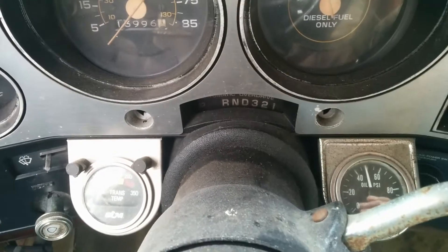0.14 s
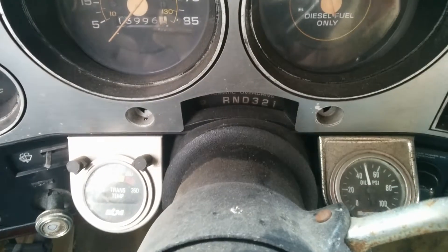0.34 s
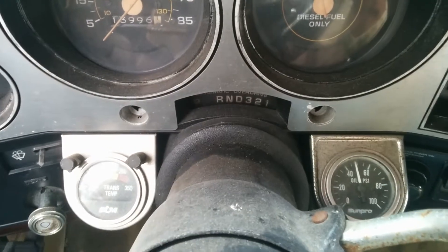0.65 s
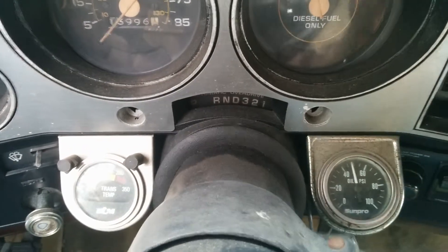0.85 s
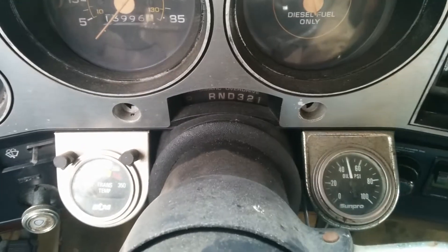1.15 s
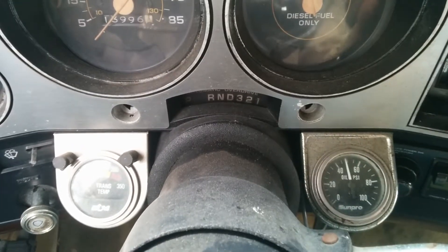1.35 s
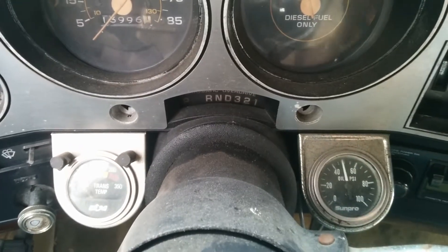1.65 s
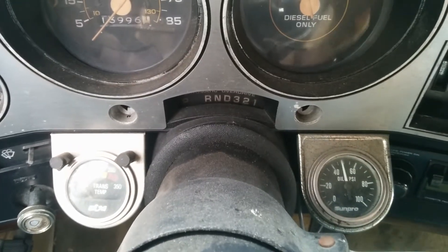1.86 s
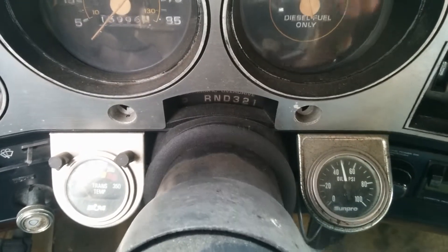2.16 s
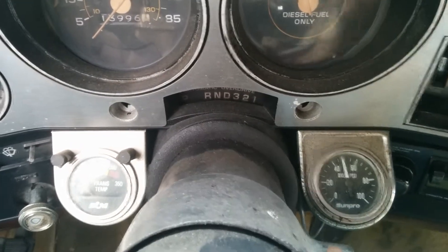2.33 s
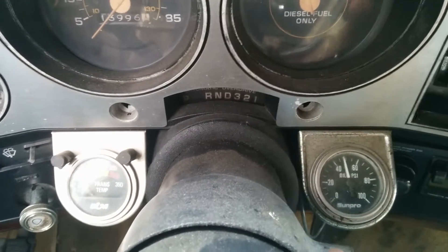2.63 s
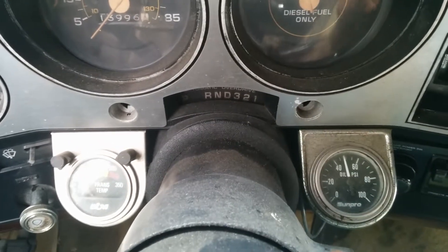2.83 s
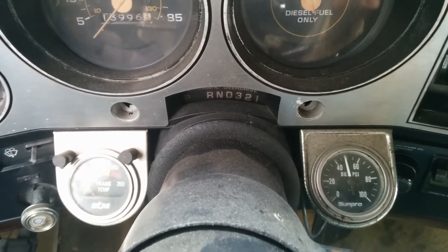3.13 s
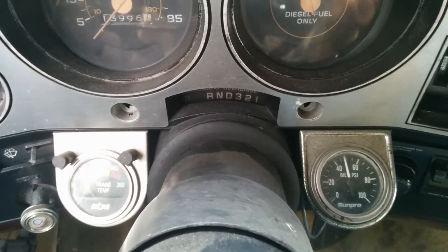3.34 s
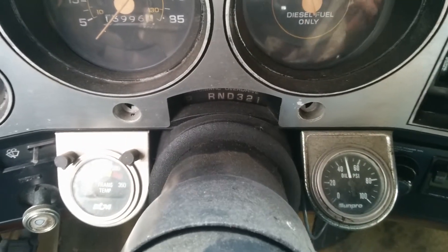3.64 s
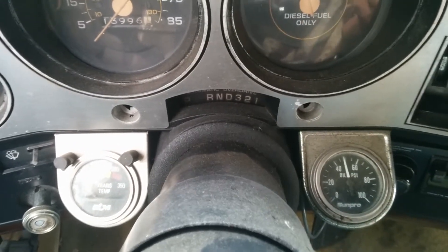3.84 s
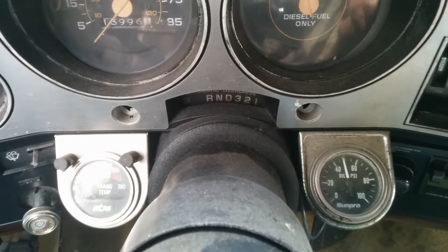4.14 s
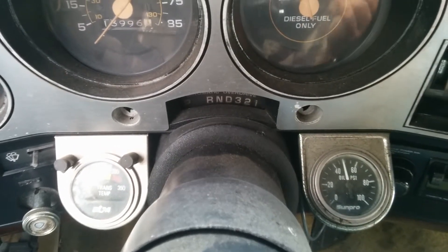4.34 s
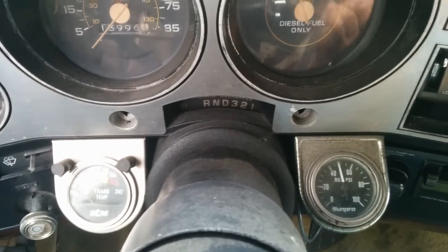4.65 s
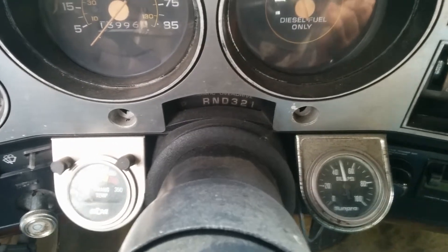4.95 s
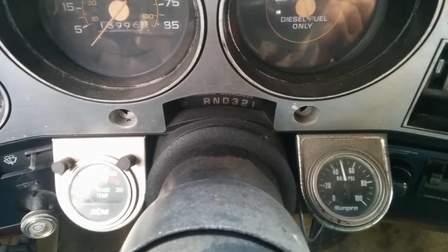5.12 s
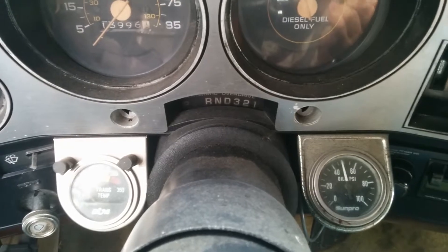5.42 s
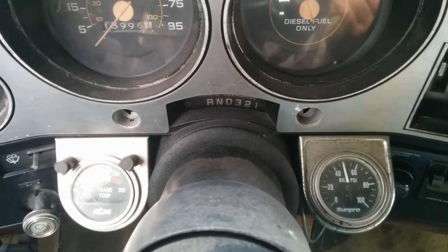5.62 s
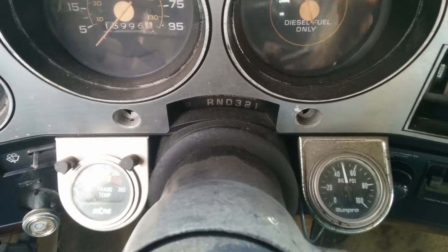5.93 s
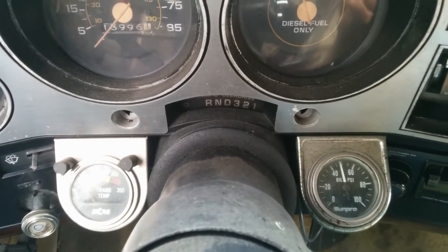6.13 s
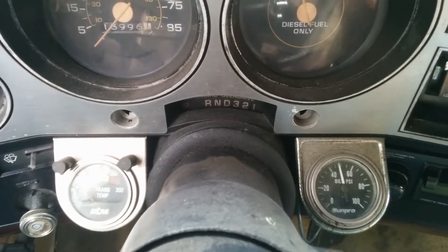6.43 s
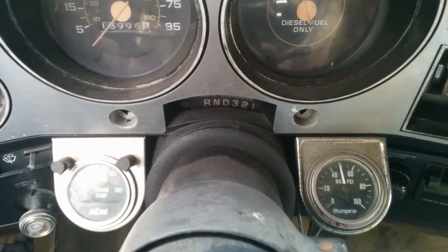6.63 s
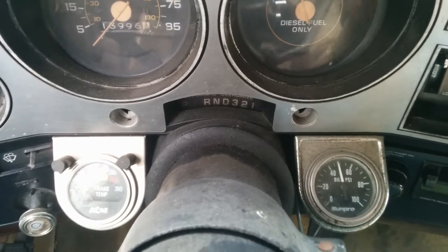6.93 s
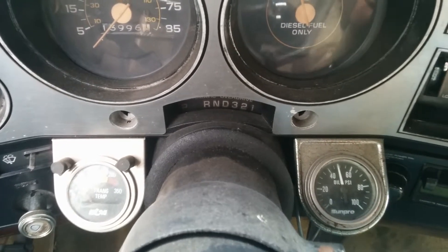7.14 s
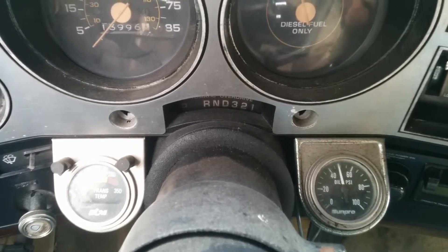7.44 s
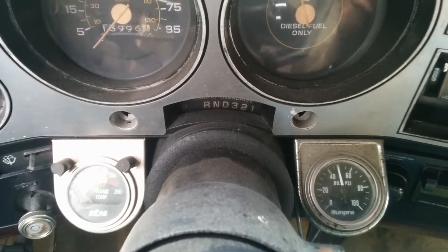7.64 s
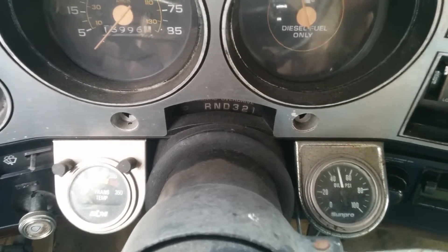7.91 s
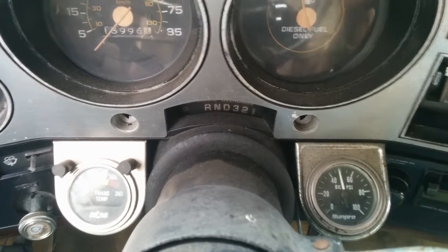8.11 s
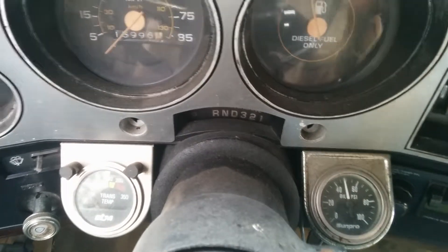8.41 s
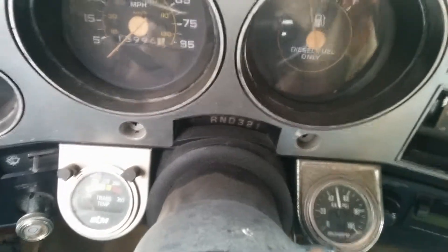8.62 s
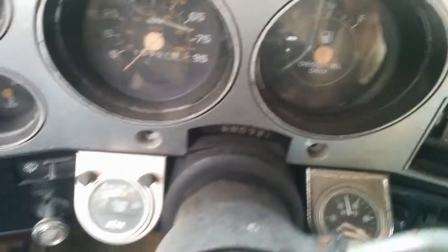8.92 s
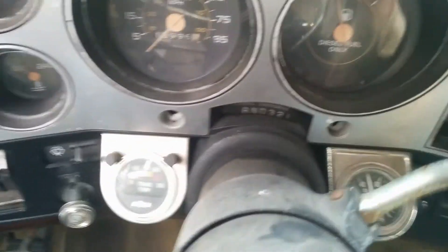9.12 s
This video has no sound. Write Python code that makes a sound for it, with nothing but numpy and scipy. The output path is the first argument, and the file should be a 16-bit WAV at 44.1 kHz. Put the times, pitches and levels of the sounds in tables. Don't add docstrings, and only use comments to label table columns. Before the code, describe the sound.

A big diesel idles with a steady low boom and knocking clatter inside a vehicle cab, broken by hard lever clacks and dull trim rattles.

```python
import sys
import numpy as np
from scipy import signal
from scipy.fft import rfft, irfft
from scipy.io import wavfile
from scipy.ndimage import uniform_filter1d

SR = 44100
rng = np.random.default_rng(int(sys.argv[2]) if len(sys.argv) > 2 else 0)


def ratio(d):
    e = np.asarray(d, float) / 20
    return 10 ** e


def pcm_store(signal):
    levels = np.round(np.clip(np.atleast_2d(signal), -1, 1) * 32767)
    wavfile.write(sys.argv[1], SR, levels.astype(np.int16).T)


N = 408807
T = np.arange(N) / SR

# (frequency [Hz], density [dB per Hz])
AIR_SPECTRUM = [(4200, -52.5), (4440, -19.5), (8340, -31), (15100, -31.5), (16000, -29)]
# (time [s], ring peak [dB], ring frequency [Hz], crack peak [dB], body re ring [dB])
CLACKS = [(0.8909, -46, 3340, -62.5, -10), (0.9524, -20, 3260, -35, 11), (0.9607, -18, 5560, -18, 3),
          (0.9844, -24, 2200, -49, 3.5), (1.0194, -36, 2550, -59, 0), (1.1443, -28.5, 2492, -35, 4.5),
          (1.1944, -38, 4660, -47, 4), (1.2214, -59, 2750, -54, -1.5), (2.2488, -28.5, 2950, -35.5, 4),
          (2.4339, -28.5, 2250, -60, -7), (2.4494, -33, 4100, -57, 2.5), (2.4738, -39.5, 3260, -56, -4.5),
          (3.6636, -28, 2200, -57, -5.5), (8.6043, -26, 3990, -29.5, -5), (8.6194, -45, 2850, -39, -8),
          (9.254, -14.5, 2250, -31, -5)]
# (time [s], ring peak [dB], ring frequency [Hz], crack peak [dB], body re ring [dB])
SNAPS = [
    (0.0333, -33.5, 6580, -48, -14),
    (1.1742, -19.5, 2340, -20.5, -1.5),
    (8.657, -11, 3760, -12.5, -31.5),
    (8.7335, -17.5, 1890, -24.5, -26),
    (9.2502, -21.5, 5550, -13.5, -3),
]
# (time [s], ring peak [dB], crack peak [dB], decay T60 [s], body re ring [dB])
RATTLES = [(0.4165, -46, -77, 0.19, -7.5), (0.4674, -39.5, -76, 0.22, 2), (0.81, -43, -86.5, 0.31, -21.5),
           (1.0447, -36.5, -50, 0.22, 10), (1.1134, -41, -56, 0.06, -9.5), (2.2442, -26, -62, 0.12, 0.5),
           (2.3255, -44.5, -60, 0.11, -12), (1.44, -66, -75, 0.082, 21), (3.4544, -28, -72.5, 0.14, 5),
           (4.6073, -26, -70.5, 0.095, 5.5), (4.6254, -45, -72, 0.12, 0.5), (4.78, -56.5, -83, 0.24, -1),
           (5.884, -52, -82, 0.15, -14.5), (5.9485, -32.5, -73, 0.13, 7), (5.9744, -45, -84, 0.079, 15.5),
           (6.7446, -28.5, -75.5, 0.13, 2.5), (6.7694, -41.5, -91, 0.087, 15),
           (6.824, -40, -76, 0.084, -15), (8.2402, -38, -63.5, 0.17, -28), (8.580, -28.5, -65, 0.27, 4.5)]
# (frequency [Hz], width [Hz], level [dB])
COLUMN_MODES = [(2250, 120, -4), (2960, 140, -2), (3760, 620, -0.5), (4440, 120, -7), (4500, 170, -8),
                (5240, 70, -5), (5700, 220, -8), (5960, 300, -9)]
# (frequency [Hz], width [Hz], level [dB])
TRIM_MODES = [(2220, 60, 1), (2720, 60, -2), (3200, 90, -7), (3565, 80, -5), (3900, 150, -11),
              (4150, 130, -13), (4780, 300, -23), (5170, 200, -24), (5715, 120, -19), (6420, 300, -27)]
# (frequency [Hz], level [dB])
CRACK_SPECTRUM = [(3500, -50), (5500, -9), (6500, 2), (8500, -0.5), (11000, -7.5), (13000, -8.5),
                  (15500, -13.5), (17000, -47.5)]
# (time [s], peak [dB], frequency
# [Hz], decay T60 [s])
THUDS = [(0.097, -18, 96, 0.1), (0.139, -16, 99, 0.09), (0.188, -20, 101, 0.11), (0.299, -18.5, 110, 0.082),
         (0.4, -18.5, 84, 0.09), (0.533, -21.5, 91, 0.16), (0.589, -18.5, 88, 0.12),
         (0.737, -18.5, 88.8, 0.11), (0.971, -17, 124, 0.1), (0.978, -6, 99.4, 0.073),
         (1.444, -16, 148, 0.066), (1.747, -17.5, 92, 0.1), (1.812, -28, 95.4, 0.075),
         (2.072, -16, 79, 0.053), (2.149, -19.5, 102, 0.1), (2.343, -18, 89.6, 0.097),
         (2.449, -21.5, 109, 0.092), (2.499, -24.5, 118, 0.073), (3.123, -25.5, 83.4, 0.084),
         (3.31, -31, 87.4, 0.11), (3.444, -21.5, 78.1, 0.083), (3.634, -25, 99, 0.068),
         (3.816, -27, 98, 0.12), (4.251, -15, 98, 0.061), (4.366, -27, 101.2, 0.13), (4.42, -20, 76, 0.13),
         (4.506, -17, 86.1, 0.083), (4.575, -15.5, 113.7, 0.1), (4.774, -23, 160, 0.17),
         (4.875, -16.5, 113, 0.11), (5.237, -24.5, 84.5, 0.1), (5.754, -23, 147, 0.14),
         (6.167, -20, 139.6, 0.1), (6.282, -24, 83, 0.072), (6.43, -23, 169.4, 0.11),
         (6.659, -18.5, 134, 0.11), (6.971, -32, 81.5, 0.073), (7.203, -19.5, 80.7, 0.084),
         (7.701, -22, 110.2, 0.12), (7.856, -21, 102, 0.1), (7.999, -20.5, 87.1, 0.09),
         (8.105, -21, 94.2, 0.15), (8.305, -17, 95, 0.12), (8.4, -20.5, 81.2, 0.065),
         (8.593, -16.5, 215.4, 0.1), (8.697, -21, 104, 0.12), (8.896, -24.5, 93.3, 0.081),
         (9.129, -20, 112.4, 0.11),
         (0.999, -8, 191, 0.046), (1.014, -8, 123.2, 0.087), (1.029, -9.5, 106.1, 0.07),
         (1.066, -15.5, 178, 0.15), (0.836, -17, 86, 0.13), (1.172, -19, 133, 0.13),
         (1.292, -27, 96, 0.093), (2.085, -21, 89.8, .07), (2.378, -14, 85, 0.084), (3.469, -23, 189, 0.16),
         (4.605, -17, 121, 0.1), (4.661, -17, 74.5, 0.058), (8.61, -16, 108, 0.073),
         (9.203, -21, 90, 0.055), (1.02, -11, 67.64, 0.15)]
# (time [s], drumming level [dB], deep part re drumming [dB], length [s])
SHUDDERS = [(0.325, -33, -2, 0.039), (0.417, -35.5, 2.5, 0.094), (1.032, -25.5, -4.5, 0.28),
            (1.281, -37.5, 2, 0.033), (1.491, -33, -2.5, 0.21), (1.747, -40, 7.5, 0.044),
            (1.834, -34.5, -5, 0.043), (2.116, -33, -2, 0.31), (2.396, -40.5, 6, 0.26),
            (3.474, -36, -22, 0.18), (4.257, -41, -4, 0.052), (4.587, -33, 3, 0.42),
            (4.8, -35.5, -5, 0.052), (4.896, -45, -8.5, 0.031), (5.78, -35, -6, 0.6),
            (6.173, -37.5, -25, 0.14), (6.727, -29, -23, 0.084), (6.983, -32.5, -8, 0.047),
            (7.218, -38, -6, 0.11), (7.718, -40, -4, 0.055), (7.89, -37.5, -1.5, 0.069),
            (8.127, -34, -3, 0.075), (8.513, -31.5, 0.5, 0.083), (8.588, -36, -11, 0.11),
            (8.995, -35.5, -8, 0.46), (9.147, -40, 2, 0.15)]
# (frequency [Hz], level [dB])
FLOOR_PAN = [(12, -32), (25, -30.5), (48, -17), (65, 17), (95, 5.5), (125, 11.5), (165, 11), (220, 11.5),
             (270, -4.5), (400, -42), (900, -95.5)]
# (multiple of the eight-firing cycle [1], rms level [dB])
ORDER_TONES = [(8, -49.5), (11, -48.5), (15, -43), (16, -46.5), (18, -55), (19, -40), (20, -52), (24, -43),
               (32, -45), (38, -49), (48, -54)]
# (time [s], speed [rpm])
CRANK_SPEED = [(0.0, 601.1), (2.05, 597.9), (2.4, 564.2), (2.6, 589.4), (2.95, 584.7), (3.3, 609.6),
               (3.6, 600.2), (4.55, 595.3), (4.85, 571.5), (5.1, 584.3), (6.0, 579.1), (7.4, 590.6),
               (7.9, 603.2), (9.3, 602.7)]
# (time [s], loudness [dB], facing the
# engine [dB])
ENGINE_LEVEL = [(0.0, -27, -9), (0.28, -35, -4), (0.55, -33.5, 1), (1.0, -29.5, -8), (1.25, -42, 1.5),
                (1.75, -42.5, -2), (2.35, -37, -2.5), (2.8, -48, 0), (3.2, -38, -2.5), (3.78, -40, -0.5),
                (4.05, -38, 3.5), (4.7, -36, -4.5), (5.0, -38, -4), (5.9, -33.5, -4), (6.3, -36.5, 0.5),
                (8.5, -34.5, -2.5), (8.85, -45, 5), (9.27, -40, 4)]
# (time [s], block peak [dB], head peak [dB], head frequency [Hz])
HARD = [(0.107, -31, -52, 2100), (0.308, -25, -48, 2090), (0.531, -29.5, -41, 2150),
        (0.732, -30, -48, 2200), (0.935, -24, -50, 2220), (1.331, -30, -32, 1708),
        (1.53, -27.5, -37.5, 2170), (1.732, -30, -44, 2110), (1.932, -29.5, -45, 2016),
        (2.135, -30, -33.5, 2110), (2.321, -31.5, -60, 1724), (2.541, -33.5, -40, 2150),
        (2.733, -33, -39.5, 2070), (2.949, -37.5, -36.5, 2095), (3.139, -29.5, -40.5, 2100),
        (3.336, -34.5, -37, 1720), (3.534, -33, -51, 1950), (3.76, -26, -45, 1680),
        (3.953, -26.5, -34, 2114), (4.159, -28, -53, 2100), (4.361, -27, -43.5, 1960),
        (4.559, -23, -35.5, 2130), (4.764, -29, -31, 2040), (4.982, -29.5, -36, 2044),
        (5.187, -29, -36, 2090), (5.389, -26, -38, 2040), (5.598, -27, -37.5, 2376),
        (5.796, -37, -43, 2100), (6.015, -26, -40, 1730), (6.218, -31.5, -37.5, 2040),
        (6.429, -29.5, -50, 2180), (6.631, -28.5, -31, 2120), (6.838, -25, -35, 2090),
        (7.041, -24, -35.5, 2006), (7.231, -32.5, -46, 1970), (7.431, -27, -39, 2100),
        (7.633, -24.5, -40, 2060), (7.845, -30, -31.5, 1713), (8.046, -26, -33, 2080),
        (8.245, -24, -31, 2080), (8.445, -23.5, -36, 2110), (8.641, -34, -34.5, 2200),
        (8.842, -27.5, -44, 2160), (9.042, -29, -49.5, 1946)]
# (frequency [Hz], width [Hz], level [dB])
HARD_BLOCK_MODES = [(900.4, 110, -1), (982, 29, -3), (1071, 29, -8)]
# (time [s], peak [dB], frequency [Hz])
STROKES = [(0.165, -30, 683), (0.478, -26, 1307), (2.36, -28, 658), (3.432, -36, 2447),
           (4.012, -28.5, 2190), (4.33, -32.5, 1290), (5.054, -29, 2330), (5.257, -35, 2400),
           (5.28, -33, 1370), (5.452, -32.5, 2330), (5.701, -26.5, 630), (5.881, -30, 2393),
           (6.532, -28.5, 2270), (6.725, -24.5, 1305), (6.945, -39, 750), (7.029, -32, 1325),
           (7.315, -29.5, 2393), (8.121, -29, 2185), (8.14, -30, 633), (9.121, -31.5, 2110)]
# (time [s], peak [dB], frequency [Hz])
PINGS = [(0.2194, -45, 1286), (1.6298, -39, 1305), (1.833, -30, 1318), (2.034, -27.5, 1291),
         (3.263, -28, 1307), (3.452, -36, 1334), (3.659, -31, 1293), (3.861, -35.5, 1350),
         (4.453, -32.5, 1268), (4.879, -36.5, 1310), (6.4278, -30, 1283), (6.633, -34, 1290),
         (6.785, -35, 1300), (7.1406, -30.5, 1296), (8.0534, -37, 1290), (8.735, -36.5, 1330),
         (9.1164, -30, 1487)]
# (time [s], depth [dB], length [s])
LULLS = [(0.281, -4, 0.047), (0.357, -11, 0.054), (0.763, -1.5, 0.036), (1.091, -1.5, 0.12),
         (1.244, -4.5, 0.063), (1.628, -5.5, 0.11), (2.186, -10.5, 0.059), (2.719, -7, 0.12),
         (2.834, -8.5, 0.08), (3.215, -8.5, 0.07), (3.417, -4.5, 0.048), (3.924, -7.5, 0.1),
         (4.436, -7, 0.092), (5.027, -6.5, 0.038), (5.351, -2, 0.056), (5.435, -9.5, 0.11),
         (5.83, -8, 0.034), (6.119, -6.5, 0.12), (6.469, -8.5, 0.089), (6.971, -10, 0.033),
         (7.112, -11.5, 0.12), (7.431, -7, 0.072), (8.89, -6.5, 0.034), (9.011, -5, 0.14)]
# (frequency [Hz], level [dB], swing per cycle [dB],
#  loudest cylinder [0-8], swing per turn [dB])
BLOCK_MODES = [(280, 8, .3, 4, .2), (335, 11, 1.3, 5.7, -1.5), (410, 6, 1.2, 6.4, -.5),
               (470, 8, .6, .5, .3), (550, 5, 1.5, .9, 2.1), (630, 6.5, 3.6, 2.1, 3.5),
               (705, 8, .7, .1, 2.9), (800, 7, 1.6, 5.3, 2.3), (905, 7.5, 2, 4.7, 3.7),
               (985, 7, 3, 5.5, 3.3), (1075, 4, 3, 5.8, 2.5), (1190, 3, 3.3, 6.3, 2.7),
               (1306, 4.5, 1.5, 2, 2.5), (1397, 1, 2.9, 2.3, 1.4)]
# (frequency [Hz], level [dB], swing per cycle [dB],
#  loudest cylinder [0-8], swing per turn [dB])
HEAD_MODES = [(1500, -2, 2.1, 2.3, .7), (1590, 0, .9, 3.5, 2.5), (1694, 2, 1.5, 4.4, 3.4),
              (1810, 1, .9, 4.9, 2.4), (1930, 2, 1.9, 5.2, 1.9), (2046, 4, 2, 5.4, 1.8),
              (2220, 3, 1.5, 6.5, 2.7), (2374, -1, 1.2, 8, 3.2), (2560, -5, .4, 4.8, 2.7)]
# (frequency [Hz], level [dB], swing per cycle [dB],
#  loudest cylinder [0-8], swing per turn [dB])
COVER_MODES = [(2720, -7, 1.3, 4.6, 2.8), (2860, -6, 1.9, 4.8, 2.2), (3190, -11, 1.7, 3.9, 2.2),
               (3380, -15, 1.3, 2, 1), (3570, -14, 1.3, 4, 1.9), (3850, -15, 1.4, 4, 1.5),
               (4130, -20, .8, 3.6, 1.4), (4900, -30, .8, 3, 1)]


def evened(x):
    return x / np.sqrt(np.mean(x ** 2) + 1e-20)


def peaked(x, db):
    return ratio(db) * x / np.abs(x).max()


def steadied(x):
    power = uniform_filter1d(uniform_filter1d(x ** 2, size=4000), size=2500)
    return x / np.sqrt(power + 1e-12)


def curve(rows, count):
    rows = np.array(rows)
    return np.interp(T, rows[:, 0], rows[:, count])


def wander(rate):
    knots = rng.standard_normal(400)
    return np.interp(T * min(rate, 40), np.arange(400), knots)


def coloured(x, points):
    f, db = np.transpose(points)
    hz = np.fft.rfftfreq(len(x), 1 / SR)
    gain = ratio(np.interp(np.log(hz + 1), np.log(f + 1), db))
    return irfft(rfft(x) * gain, len(x))


def band(x, lo_hz, hi_hz):
    return signal.sosfilt(signal.butter(2, [lo_hz, hi_hz], "bandpass", fs=SR, output="sos"), x)


def low_pass(x, order, hz):
    return signal.sosfilt(signal.butter(order, hz, fs=SR, output="sos"), x)


def ring(x, hz, width):
    r = np.exp(-np.pi * max(width, 5) / SR)
    return 2 * signal.lfilter([1 - r], [1, -r * np.exp(2j * np.pi * hz / SR)], x).real


def add(mix, s, sound):
    part = mix[round(s * SR):][:len(sound)]
    part += sound[:len(part)]


def heard(db, loud_share, facing_share):
    usual_db = -41
    loudness = curve(ENGINE_LEVEL, count=1) - usual_db
    return db + loud_share * loudness + facing_share * curve(ENGINE_LEVEL, count=2)


def hiss():
    noise = coloured(rng.standard_normal(N), AIR_SPECTRUM)
    return ratio(-78 + 1.3 * wander(11.0)) * evened(noise)


def cab(x):
    t = np.arange(24000) / SR
    early_t60, late_t60, late_db = 0.067, 0.63, -19
    decay = ratio(-60 * t / early_t60) + ratio(late_db - 60 * t / late_t60)
    tail = rng.standard_normal(len(t)) * decay * np.minimum(t / .003, 1)
    tail = coloured(tail, [(200, 9.5), (4000, -14.5), (9000, -8.0), (16000, -16.5)])
    return signal.fftconvolve(x, tail / np.linalg.norm(tail))[:N]


def strike(ring_db, hz, crack_db, t60, body_db, rise, width, grain_db, column_db, body_hz, frame):
    t = np.arange(20000) / SR
    noise = rng.standard_normal((4, len(t)))
    share_db = 3 * rng.standard_normal(len(frame))
    grain = ratio(grain_db * np.interp(t * 200, np.arange(120), rng.standard_normal(120)))
    decay = ratio(-60 * t / t60) + ratio(-26 - 60 * t / t60 / 3.8)
    fall = np.minimum(t / rise, 1) * decay * grain

    modes = 0
    for (f, w, db), share in zip(frame, share_db):
        mode = ring(ring(fall * noise[1], f * (1 + share / 400), w), f, 3 * w)
        modes = modes + ratio(db + share) * mode
    leading = ring(ring(fall * noise[0], hz, width), hz, 3 * width)
    rings = low_pass(peaked(leading, 0) + peaked(modes, column_db), 12, 6700)
    body = low_pass(fall * band(noise[2], body_hz, 1000), 4, 1400)
    crack = fall ** (1 / 0.94) * coloured(noise[3], CRACK_SPECTRUM)
    return peaked(rings, ring_db + 1.5) + peaked(body, ring_db + body_db) + peaked(crack, crack_db + 3)


def lever():
    out = np.zeros(N)
    for rows, t60, column_db in ((CLACKS, 0.074, 1.5), (SNAPS, 0.026, -7.0)):
        for s, db, hz, crack_db, body_db in rows:
            hit = strike(db, hz, crack_db, t60, body_db, rise=0.0015, width=430, grain_db=-5.5,
                         column_db=column_db, body_hz=347, frame=COLUMN_MODES)
            add(out, s, hit)
    for s, db, crack_db, t60, body_db in RATTLES:
        hit = strike(db, 2850, crack_db, t60, body_db, rise=0.0035, width=120, grain_db=4.5,
                     column_db=2.5, body_hz=260, frame=TRIM_MODES)
        add(out, s, hit)
    return out


def thuds():
    out, t = np.zeros(N), np.arange(12000) / SR
    for s, db, hz, t60 in THUDS:
        sagging_hz = hz * (1 + 0.12 * np.exp(-t / 0.023))
        turns = np.cumsum(sagging_hz) / SR + rng.random()
        envelope = (1 - np.exp(-t / 0.0022)) ** 2 * ratio(-60 * t / max(t60, .03))
        add(out, s, peaked(envelope * np.sin(2 * np.pi * turns), db - 6.5))
    return coloured(out, [(40, -18), (62, 0)])


def shudders():
    drum = ratio(heard(-45, loud_share=0.79, facing_share=0.011))
    power = np.array([drum ** 2, (drum * ratio(-0.5)) ** 2])
    for s, db, deep_db, length in SHUDDERS:
        side_share = np.where(T < s, 0.26, 0.74)
        away = (T - s) / (max(length, .02) * side_share)
        swell = ratio([[db - 2.5], [db - 2.5 + deep_db]]) ** 2
        power += swell * np.exp(-2 * away ** 2)
    return np.sqrt(power)


def boom(fired):
    tones = 0
    for k, db in ORDER_TONES[1:]:
        phase = 2 * np.pi * (k * fired / 8 + rng.random()) + 0.99 * wander(7)
        tones = tones + ratio(db + 6.4 * wander(10)) * np.cos(phase)

    stray_size = rng.choice([-1., 1.], N) * ratio(3.5 * np.minimum(rng.exponential(1, N), 3))
    strays = stray_size * (rng.random(N) < 91 / SR)
    late = np.floor(fired + .12 * wander(30))
    push = (np.diff(late, prepend=late[0]) > 0) * ratio(2.5 + 6 * rng.standard_normal(N))
    thumps = coloured(push + strays, FLOOR_PAN)
    pan = ratio(3.5) * evened(tones) + evened(thumps)
    deep = coloured(pan, [(95, 0), (115, -40)])

    drum, deep_gain = shudders()
    steady = ratio(0.89 * (uniform_filter1d(20 * np.log10(drum), 4000) + 44.0))
    firing_tone = np.sqrt(2) * ratio(ORDER_TONES[0][1] + 1.8 * wander(7.8)) * np.cos(2 * np.pi * fired)
    lumps_db = 2.1 * wander(14) + 0.98 * np.cos(2 * np.pi * fired)
    deep_part = deep_gain * ratio(lumps_db) * steadied(deep)
    upper_part = drum * ratio(1.3 * lumps_db) * steadied(pan - deep)
    return upper_part + deep_part + steady * firing_tone


def blow(hold, modes):
    t = np.arange(8000) / SR
    shape = np.minimum(t / 0.0013, 1) * ratio(-60 * np.maximum(t - hold, 0) / 0.2)
    tick, out = 16 * (np.arange(len(t)) == 20), 0
    for hz, width, db in modes:
        hz = hz * (1 + .018 * rng.uniform(-0.99, 1))
        drive = tick + shape * rng.standard_normal(len(t))
        out = out + ratio(db) * evened(ring(ring(drive, hz, width), hz, 7 * width))
    return low_pass(out, 6, 2900)


def hard_firings():
    out = np.zeros(N)
    for s, db, head_db, hz in HARD:
        head_modes = [(hz, 70, 0), (2230, 80, -4), (1700, 60, -6)]
        add(out, s, peaked(blow(0.016, HARD_BLOCK_MODES), db - 4.5))
        add(out, s, peaked(blow(0.016, head_modes), head_db + 1))
    for s, db, hz in STROKES:
        add(out, s, peaked(blow(0.028, [(hz, 45, 0), (0.93 * hz, 60, -4)]), db - 7.0))
    for s, db, hz in PINGS:
        add(out, s, peaked(blow(0.0083, [(hz, 25, 0)]), db - 7.5))
    return out


def lulls():
    return sum(db * np.exp(-2 * ((T - s) / max(length, .02)) ** 2 * 2.1) for s, db, length in LULLS)


def knock(fired):
    lit = fired + 1 - .04
    firing = np.floor(lit).astype(int)
    burst = 1 + .7 * np.exp(-(lit % 1) / .4)
    force_db = .6 * rng.standard_normal(400)
    middle = np.arange(400) - .5
    parts = np.zeros((3, N))
    for hz, db, cycle_db, cylinder, turn_db in BLOCK_MODES + HEAD_MODES + COVER_MODES:
        width = max(.026 * hz, 26)
        cycle_swing = cycle_db * np.cos(2 * np.pi * (middle - cylinder) / 8)
        turn_swing = turn_db * np.cos(2 * np.pi * (middle - 1.75) / 4)
        swing_db = 9 * np.tanh((cycle_swing + turn_swing) / 6)
        size = ratio(db + swing_db + force_db + 2.6 * rng.standard_normal(400))
        lag = int(rng.uniform(-1.9, 1) * 0.39 * SR / 40)
        force = np.roll(uniform_filter1d(burst * size[firing], size=100), lag)
        drive = force * rng.standard_normal(N)
        layer = (hz > 1450) + (hz > 2650)
        parts[layer] += ring(ring(drive, hz, 1.3 * width), hz, 3.0 * width)

    valve_size = ratio(force_db + 1.5 * np.cos(2 * np.pi * (middle - 1.8) / 4))
    valves = burst * valve_size[firing] * rng.standard_normal(N)
    parts[2] += ratio(-31.5) * band(uniform_filter1d(valves, size=3), 3500, 6100)

    parts *= ratio(np.array([[.3], [.9], [.3]]) * lulls())
    low_block = ratio(heard(-42, loud_share=0.55, facing_share=0.01)) * evened(parts[0])
    upper_block = ratio(heard(-50.5, loud_share=1.19, facing_share=0.94)) * evened(parts[1])
    clatter = ratio(heard(-63.5, loud_share=0.92, facing_share=0.84)) * evened(parts[2])
    return low_block + upper_block + clatter


def scene():
    firings_per_s = curve(CRANK_SPEED, count=1) * 4 / 60
    fired = -.25 + np.cumsum(firings_per_s) / SR
    hits = lever()
    lever_in_cab = hits + ratio(-12.5) * cab(hits)
    engine = boom(fired) + hard_firings() + knock(fired)
    return (hiss() + lever_in_cab + thuds() + engine)[None]


def band_limit(x):
    return signal.sosfilt(signal.butter(12, 16640, fs=SR, output="sos"), x)


def record(dry):
    z = signal.stft(dry, nperseg=512)[2]
    power = uniform_filter1d(uniform_filter1d(abs(z) ** 2, size=3, axis=2), size=3, axis=1)
    now_db = 10 * np.log10(power + 1e-16)
    mean_db = uniform_filter1d(now_db, size=70, axis=2)
    under_db = np.minimum(now_db - mean_db - 2.0, 0)
    gated = signal.istft(z * ratio(1.5 + .45 * under_db), nperseg=512)[1][:, :N]
    return band_limit(gated)


dry = scene()
out = record(dry)
pcm_store(out)
```